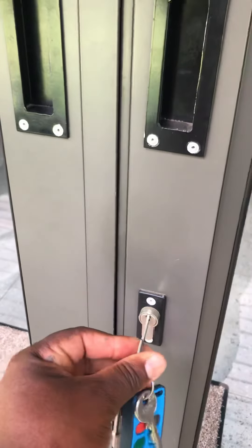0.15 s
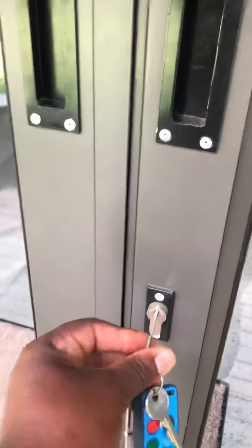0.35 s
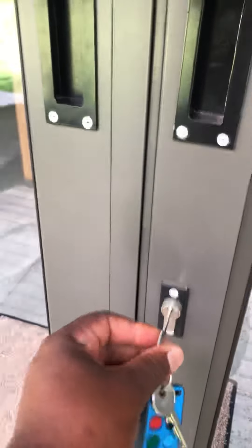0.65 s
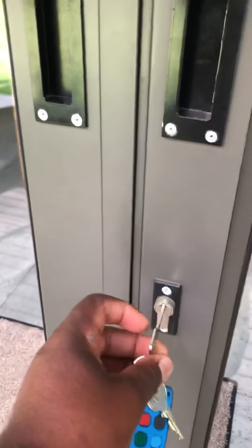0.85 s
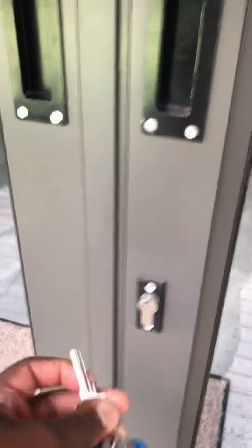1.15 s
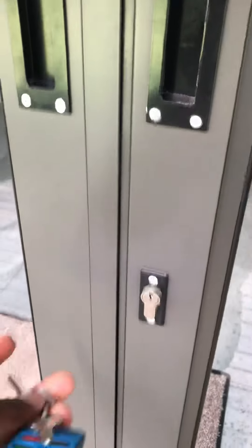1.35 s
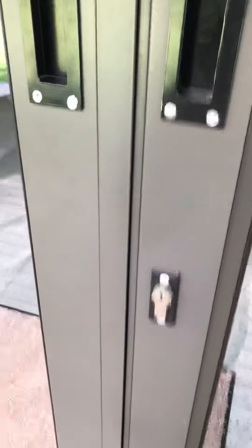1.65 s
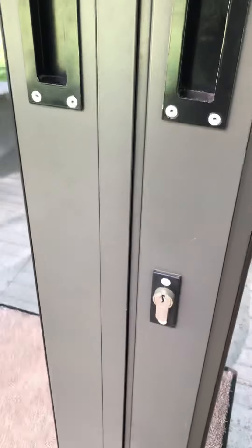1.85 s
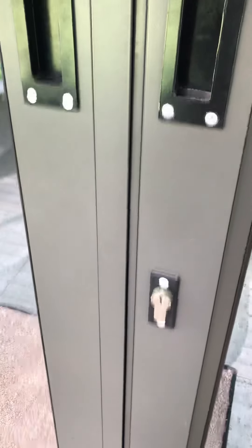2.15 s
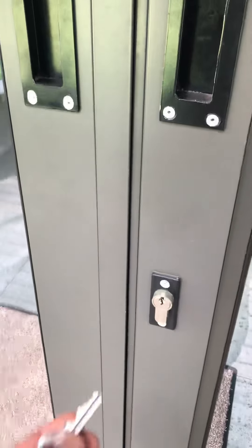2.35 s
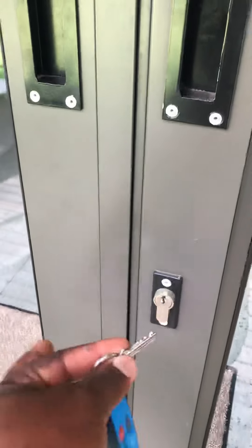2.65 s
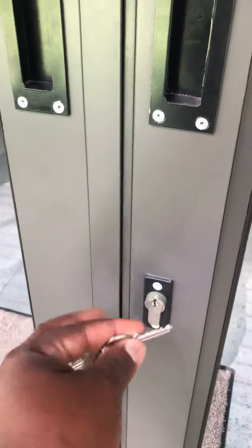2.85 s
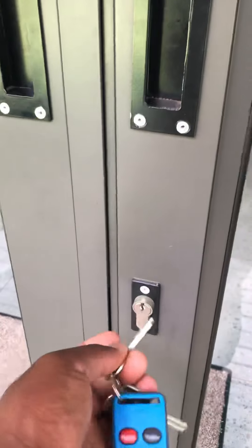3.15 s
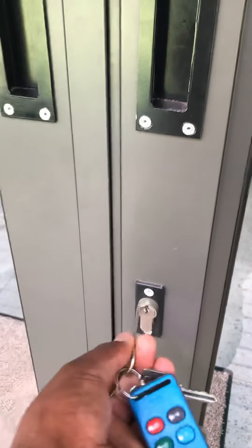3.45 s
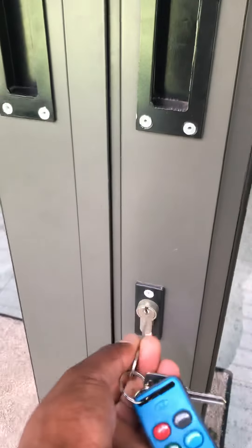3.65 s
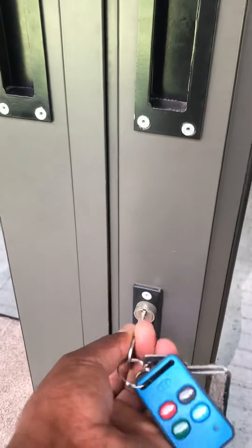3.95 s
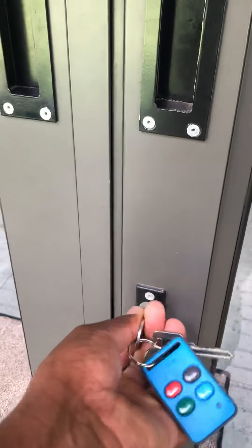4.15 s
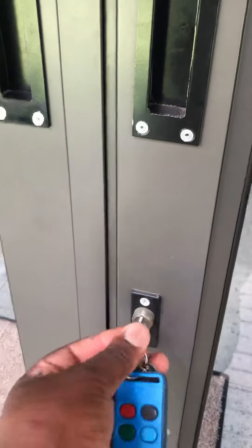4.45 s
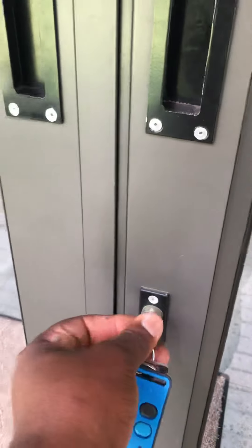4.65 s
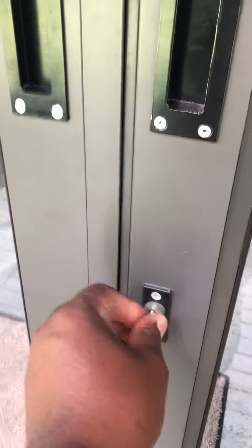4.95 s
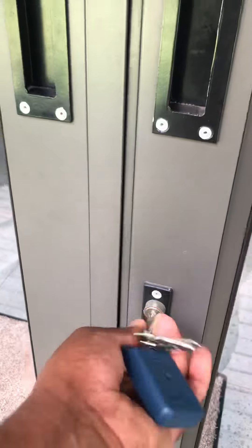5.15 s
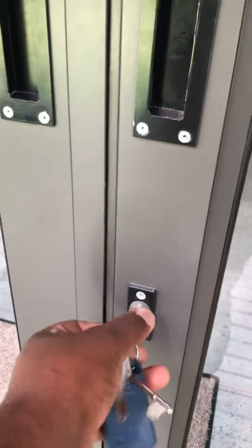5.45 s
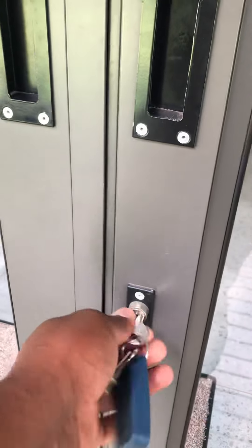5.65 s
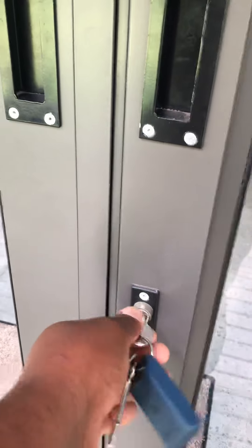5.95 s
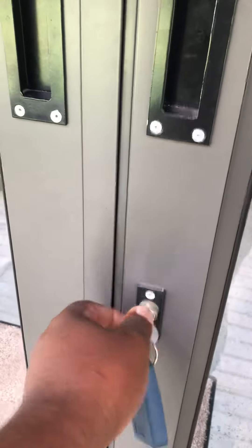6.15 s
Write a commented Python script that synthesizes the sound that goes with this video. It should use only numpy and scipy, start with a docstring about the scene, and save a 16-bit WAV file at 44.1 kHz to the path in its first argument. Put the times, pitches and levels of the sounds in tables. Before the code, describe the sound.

Small dry lock clicks come first, with a sharp snap at about one second, then thin high key tinkles growing busy. A quick ratchet of pins and scrape follows, then firm double clacks and a loud hollow bolt strike with chatter. The microphone is close, with a short porch echo; outdoors, road roar and a low sinking engine hum rise behind distant falling bird whistles.

```python
"""A key is drawn out of a metal-framed door on a porch; the bunch jangles while another key is picked. That one
is pushed in over the pins and turned until the bolt shoots and the frame rings: contacts are short noise bursts
plus decaying modes, and the key and the sliding bolt scrape in tiny slips through resonators. Behind it a
vehicle passes with swelling road noise and a slowly sinking hum, and a far bird whistles in falling glides."""
import sys
import numpy as np
from scipy import signal
from scipy.fft import rfft, irfft
from scipy.io import wavfile

SR = 44100
rng = np.random.default_rng(int(sys.argv[2]) if len(sys.argv) > 2 else 0)


def put_to_file(sound):
    """Save the sound as 16-bit audio at rate SR, in the file named by the first command-line argument."""
    columns = np.atleast_2d(sound).T  # one column per channel
    safe = np.clip(columns, -1, 1)
    whole_steps = np.round(safe * 32767)
    wavfile.write(sys.argv[1], SR, whole_steps.astype(np.int16))


N = 277830
TIME = np.arange(N) / SR
AGE = TIME[:SR // 3]   # seconds since a blow
ATTACK = int(.004 * SR)   # samples that set the level of a blow


def from_db(db):
    """Amplitude factor of a level in dB."""
    return 10 ** (np.asarray(db) / 20)


def rms_one(x):
    """Scale a sound to rms 1."""
    return x / np.sqrt(np.mean(x ** 2) + 1e-20)


def attack_one(x):
    """Scale a blow so that its first milliseconds have rms 1."""
    return x / np.sqrt(np.mean(x[:ATTACK] ** 2) + 1e-20)


def add(out, s, sound):
    """Mix a sound in at time s."""
    i = int(np.clip(s * SR, 0, N - 1))
    out[i:i + len(sound)] += sound[:N - i]


def coloured(x, spectrum):
    """Give a noise the stated spectrum; rms 1."""
    hz, db = np.transpose(spectrum)
    bins = np.maximum(np.fft.rfftfreq(len(x), 1 / SR), 1)
    gain = from_db(np.interp(np.log(bins), np.log(hz), db))
    return rms_one(irfft(rfft(x) * gain, len(x)))


def drift(rate):
    """Random wandering of rms 1 that takes a new target rate times a second."""
    return rms_one(np.interp(TIME * rate, np.arange(N), rng.standard_normal(N)))


def dying(t60):
    """Exponential decay by 60 dB in t60 seconds, never quicker than 1 ms."""
    return np.exp(-np.log(1000) * AGE / max(t60, 1e-3))


def damped(after_s, t60=0.027):
    """Gain that holds until something touches the key, then dies away."""
    return np.exp(-np.log(1000) * np.maximum(AGE - after_s, 0) / t60)


def crack(spectrum, t60, snap=0.24):
    """An instant of contact, then many short-lived modes that blur into noise."""
    noise = coloured(rng.standard_normal(len(AGE)), spectrum)
    return attack_one(noise * (dying(t60) + snap * dying(0.0091)))


def ring(modes, spread_db=3):
    """Modes (pitch_hz, level_db, t60_s); each blow lands elsewhere and excites them differently."""
    out = np.zeros(len(AGE))
    for hz, db, t60 in modes:
        strength = from_db(db + spread_db * rng.normal())
        out += strength * dying(t60) * np.sin(2 * np.pi * (hz * AGE + rng.random()))
    return attack_one(out)


def grains(spans, per_s, size_db, t60, count=28):
    """A gain that swells and fades over each span, and tiny random contacts through many resonators."""
    stroke = np.zeros(N)
    for start, end, db in spans:
        arch = np.clip(4 * (TIME - start) * (end - TIME) / (end - start) ** 2, 0, 1)
        stroke += from_db(db) * np.sqrt(arch)
    sizes = from_db(size_db * np.minimum(rng.exponential(1, N), 3))
    touches = (rng.random(N) < per_s / SR) * sizes
    strengths = rng.normal(size=N) ** 2 * rng.choice([-1, 1], N)
    out, radius = np.zeros(N), from_db(-60 / (t60 * SR))
    for k, hz in enumerate(np.linspace(1500, 15300, count) + rng.uniform(-200, 160, count)):
        w = 2 * np.pi * hz / SR
        # rolling the strengths gives each contact its own mix of pitches
        hits = touches * np.roll(strengths, k) + 1e-18
        out += signal.lfilter([0, np.sin(w)], [1, -2 * radius * np.cos(w), radius ** 2], hits)
    return stroke, out


# background noise: pitch_hz, relative_level_db
AIR_COLOUR = [(25, -24), (100, -2), (400, 9.5), (1500, -46), (3000, -23), (6500, -13), (9500, -20),
              (10500, -21), (16000, -25)]


def air():
    """Steady quiet background: shaped noise."""
    return from_db(-59) * coloured(rng.standard_normal(N), AIR_COLOUR)


def passing(nearest_s, db, width_s):
    """Gain of a source on a straight road, falling as one over its distance."""
    return from_db(db) / np.hypot(1, (TIME - nearest_s) / width_s)


# colours of the three road noises: pitch_hz, relative_level_db
TYRE_COLOUR = [(30, -28), (130, -7.5), (200, -7), (320, -7.5), (480, -12), (650, -7.5), (830, 1),
               (970, 0.5), (1250, -7), (1800, -15), (2600, -22.5), (4500, -29.5), (8000, -41.5),
               (11000, -50)]
RUMBLE_COLOUR = [(20, -24), (33, -17), (48, 0), (65, 6), (100, -2), (130, -8), (180, -23.5), (300, -37),
                 (700, -93)]
DRONE_COLOUR = [(30, -51), (118, 6.5), (145, 0.5), (180, 3), (240, -7), (500, -29), (3000, -92)]
# how each road noise swells and fades: nearest_s, level_there_db, time_to_fall_3_db_s
TYRE_PASS = (4.78, -36.5, 1.61)
RUMBLE_SWELL = (3.16, -36, 1.45)
DRONE_SWELL = (5.7, -43.5, 1.44)
# how the exhaust note comes and goes: time_s, level_db (before the engine trim)
EXHAUST_FADER = [(0, -50), (2.5, -49.5), (3.3, -36), (3.54, -38), (3.57, -32), (4.29, -25.5), (4.37, -35.5),
                 (4.43, -29), (5.0, -29), (5.06, -35), (5.4, -39.5), (5.43, -33.5), (6.22, -30), (6.3, -32)]
# the note's middle pitch, its reach to either side, when it is there and how slowly it sinks
EXHAUST_HZ, DOPPLER_HZ, ABREAST_S, GLIDE_S = 89.65, 10.5, 3.8, 2.2


def traffic(engine_db=-1, waver_db=0.5, overtone_db=-24):
    """Rumble, then tyre roar, then drone reach their loudest; the exhaust note sinks as the vehicle goes by."""
    fader_s, fader_db = np.transpose(EXHAUST_FADER)
    level_db = np.interp(TIME, fader_s, fader_db) + engine_db + waver_db * drift(12)
    receding = (TIME - ABREAST_S) / np.hypot(GLIDE_S, TIME - ABREAST_S)   # towards -1 nearing, +1 leaving
    hz = (EXHAUST_HZ - DOPPLER_HZ * receding) * (1 + 0.0074 * drift(12))
    phase = 2 * np.pi * np.cumsum(hz) / SR
    note = np.sin(phase) + from_db(overtone_db) * np.sin(2 * phase)
    out = from_db(level_db) * np.sqrt(2) * note
    layers = ((RUMBLE_SWELL, RUMBLE_COLOUR), (TYRE_PASS, TYRE_COLOUR), (DRONE_SWELL, DRONE_COLOUR))
    for path, colour in layers:
        out += passing(*path) * coloured(rng.standard_normal(N), colour)
    return out


# the bird's falling whistles: start_s, first_pitch_hz, level_db (before the bird trim)
BIRD_WHISTLES = [(.05, 4420, -51), (1.54, 4300, -57), (2.16, 3610, -58), (3.14, 3500, -51),
                 (3.48, 4300, -57), (3.8, 4200, -49)]
WHISTLE_S, WHISTLE_FALL = .21, .2   # length; share of the pitch lost


def bird(level_db=-5, blur_hz=190, flutter_db=3):
    """Far whistles glide down, blurred and broken up by their many paths."""
    out = np.zeros(N)
    blur = blur_hz * drift(600)
    for start, first_hz, db in BIRD_WHISTLES:
        along = np.clip((TIME - start) / WHISTLE_S, 0, 1)
        hz = first_hz * (1 - WHISTLE_FALL * along) + blur
        swell = np.sqrt(np.abs(np.sin(np.pi * along)))
        out += from_db(db + level_db) * swell * np.sin(2 * np.pi * np.cumsum(hz) / SR)
    return out * from_db(flutter_db * drift(66))


# single contacts of the key, its fob and the lock's parts: start_s, contact_name, level_db (before shares)
SINGLE_CLICKS = [(.0947, "tip", -46.5), (.151, "tip", -50.5), (.287, "tip", -48), (.5528, "tip", -45),
                 (.599, "tip", -48), (.6247, "tip", -47), (.99, "pin", -27), (.997, "fob", -41),
                 (1.5848, "fob", -35), (1.6602, "fob", -35.5), (1.733, "tip", -43),
                 (1.7871, "shank", -29.5), (2.8563, "fob", -36.5), (3.422, "plug", -37.5),
                 (4.1121, "blade", -30), (4.4757, "tip", -34), (4.5047, "pin", -25), (4.8955, "pin", -23),
                 (5.2586, "pin", -36), (5.3112, "tip", -36), (5.4316, "tip", -30), (5.5891, "pin", -26),
                 (5.596, "bolt", -24), (5.6628, "bolt", -21.5), (5.6912, "shank", -31),
                 (5.7109, "plug", -27), (5.848, "tip", -34), (5.9012, "pin", -42), (6.259, "plug", -37.5),
                 (6.2924, "blade", -31)]
# a part runs against its stop and strikes again as the play is taken up:
# start_s, contact_name, level_db, gap_s, second_level_db (levels before shares)
DOUBLE_CLACKS = [(0.3993, "shank", -28.5, 0.005, -36), (.964, "blade", -18.5, .0035, -20),
                 (3.6093, "tip", -29, 0.012, -35), (4.137, "plug", -23, 0.0033, -25),
                 (4.5125, "plug", -21, 0.0075, -19), (5.2209, "plug", -23, .0133, -26.5),
                 (5.7146, "bolt", -12.5, 0.0051, -10)]
# the key speeds up as it goes in, so each pin follows sooner than the last
PINS_START_S, FIRST_PIN_GAP_S, PIN_GAP_RATIO = 4.0279, .0227, .85
PIN_DB, PIN_FADE_DB = -28, 1   # first pin; loss per pin
# the thrown bolt chatters in its keep, ever more softly
CHATTER_START_S, CHATTER_GAP_S, CHATTER_DB, CHATTER_FADE_DB = 5.7238, .013, -19.5, 3.5


def contacts():
    """Every blow of key, fob and lock parts: clicks, double clacks, the run over six pins, bolt chatter."""
    blows = list(SINGLE_CLICKS)
    for s, kind, db, gap, second_db in DOUBLE_CLACKS:
        blows += [(s, kind, db), (s + gap, kind, second_db)]
    for k in range(6):
        elapsed = FIRST_PIN_GAP_S * (1 - PIN_GAP_RATIO ** k) / (1 - PIN_GAP_RATIO)
        blows.append((PINS_START_S + elapsed, "pin", PIN_DB - PIN_FADE_DB * k))
    for k in range(6):
        blows.append((CHATTER_START_S + CHATTER_GAP_S * k, "bolt", CHATTER_DB - CHATTER_FADE_DB * k))
    return blows


# how each kind of contact sounds, by name: hollow_knock_db, bright_click_db, sharp_snap_db,
# click_noise_pitch_ratio, click_noise_t60_s (zero or less gives the shortest click)
CONTACT_KINDS = {"tip": (-5, 0, -26, 0.9, 0.0559), "shank": (-5.5, -1, -13, 1, 0),
                 "blade": (-19.5, 0, -7.5, 0.95, 0.01), "pin": (-18, -5.5, 0, 1.14, .014),
                 "plug": (-9, 0, -2.5, 1, -0.01), "bolt": (-5, -1, -5.5, 1.0, 0.0333),
                 "fob": (-2, -5, -3, 1.1, -0.03)}
# the lock cylinder and its case: pitch_hz (before seating), relative_level_db, t60_s
CYLINDER_MODES = [(2300, -19, 0.12), (2870, -30, 0.042), (3160, -3, 0.08), (3860, -27, 0.042),
                  (3800, -5, 0.12), (4360, 5.5, 0.075), (4670, -20, 0.076), (5110, -4, 0.02),
                  (5400, 3, 0.056), (6440, -0.5, 0.045), (6820, -12, 0.082), (6950, 1, 0.026)]
# the hollow door frame: pitch_hz, relative_level_db, t60_s
HOLLOW_FRAME_MODES = [(1447, 2.5, 0.027), (1498, 2.5, 0.058), (1710, 0.5, 0.091), (1920, 1, 0.032),
                      (2130, -10, .22), (2340, -6.5, 0.17)]
# contact noises of frame, cylinder (before its pitch ratio) and metal edge: pitch_hz, relative_level_db
FRAME_COLOUR = [(100, -4.5), (300, -21), (600, -2.5), (1100, -2), (1600, 0), (2400, 0), (3300, -2),
                (6000, -22.5)]
CYLINDER_COLOUR = [(1000, -11.5), (2200, -16.5), (3200, 8.5), (4400, 0.5), (7200, -2), (9000, -35),
                   (13000, -28)]
EDGE_COLOUR = [(4000, -20), (7000, 3.5), (9700, -1), (10800, 2), (12800, 4), (16000, 4.5)]


def key_and_lock(frame_db=-1.0, cylinder_db=-2.0, edge_db=0, frame_ring_db=-7, cylinder_ring_db=-7,
                 heavy_db=-33):
    """Each contact gives a sharp snap, a ring of the cylinder and a knock of the frame."""
    out = np.zeros(N)
    for s, kind, level in contacts():
        *shares_db, pitch, click_t60 = CONTACT_KINDS[kind]
        frame, cylinder, edge = level + np.array(shares_db)

        knock = crack(FRAME_COLOUR, t60=0.068) + from_db(frame_ring_db) * ring(HOLLOW_FRAME_MODES)

        seating = 1 + rng.uniform(-0.048, 0.05)   # the pitch shifts with how key and pins are seated
        seated_modes = [(hz * seating, db, t60) for hz, db, t60 in CYLINDER_MODES]
        click = crack([(hz * pitch, db) for hz, db in CYLINDER_COLOUR], click_t60)
        click = click + from_db(cylinder_ring_db) * ring(seated_modes)

        dulling = max(frame - heavy_db, 0)   # heavy parts stay in contact longer and lose the top
        snap = crack([(hz, db - dulling * (hz > 10200)) for hz, db in EDGE_COLOUR], t60=0.023)

        blow = from_db(frame + frame_db) * attack_one(knock)
        blow += from_db(cylinder + cylinder_db) * attack_one(click)
        blow += from_db(edge + edge_db) * snap
        add(out, s, blow)
    return out


# key scraping, in the keyway or outside it, and at the end the bolt sliding: start_s, end_s, level_db (of the
# dull part)
SCRAPES = [(.99, 1.024, -57), (1.617, 1.762, -57), (3.998, 4.08, -49.5), (4.078, 4.16, -37.5),
           (4.496, 4.568, -57), (5.095, 5.22, -55.5), (5.21, 5.267, -35.5), (5.42, 5.562, -46),
           (5.575, 5.712, -48), (5.74, 5.87, -53)]


def scraping(bright_db=-7):
    """The key scrapes, in the keyway or outside it, and the thrown bolt slides, in many tiny slips."""
    stroke, slips = grains(SCRAPES, per_s=1200, size_db=1.0, t60=0.0078)
    return stroke * (coloured(slips, CYLINDER_COLOUR) + from_db(bright_db) * coloured(slips, EDGE_COLOUR))


# bending modes of three keys and the ring that holds them, by name: pitch_hz, relative_level_db
BENDING_MODES = { "long": [(2820, -26), (5630, -28), (7060, -14.5), (9960, -8.5), (12652, 1), (12715, -13),
                 (13390, -9), (14785, -7.5)], "short": [(5630, -9.5), (6950, -12), (10090, 1.5),
                 (11800, -13), (12780, 5), (13420, -12.5), (14850, 1)], "split ring": [(5630, 3),
                 (7100, -2), (10050, -17), (12700, -5), (14850, -14)], "flat": [(5810, -9.5), (7620, 6),
                 (11400, -1.5), (12400, 3.5), (13450, -20), (14850, -17)]}


def key_ring(key, t60):
    """One key's modes; the fingers hold it differently each time and favour some over others."""
    return ring([(hz, db, t60) for hz, db in BENDING_MODES[key]], spread_db=3.5)


# the clear knocks of key on key: start_s, key_name, ring_level_db, tick_level_db (before the tick trim)
KEY_KNOCKS = [(1.0963, "short", -44, -42.5), (1.866, "split ring", -46, -47),
              (2.053, "split ring", -35, -48.5), (2.176, "short", -50, -46), (2.2027, "short", -41, -40.5),
              (2.3438, "flat", -33.5, -58), (2.5347, "short", -51, -51), (2.5623, "long", -55, -40.5),
              (2.665, "flat", -40.5, -43.5), (2.7083, "flat", -34, -36), (2.7417, "short", -30, -38),
              (2.821, "short", -40, -55), (2.863, "long", -29.5, -44), (2.935, "long", -31.5, -58),
              (2.9477, "short", -29.5, -43), (2.966, "long", -33.5, -47), (3.0654, "short", -40, -47),
              (3.0973, "split ring", -46, -54), (3.112, "short", -42, -48), (3.125, "short", -22.5, -49),
              (3.1464, "short", -25, -50), (4.2443, "short", -52, -45.5), (4.2638, "short", -43.5, -42),
              (4.4291, "short", -35, -24), (4.4446, "short", -42, -31), (4.544, "short", -35, -44),
              (4.5794, "short", -32.5, -51), (4.5992, "short", -37, -39.5), (5.3224, "short", -42, -41),
              (5.338, "short", -43, -45.5), (5.4147, "long", -39, -45), (5.463, "short", -28, -25.5),
              (5.499, "long", -46, -32), (5.513, "short", -42, -38), (5.5322, "short", -46, -31),
              (5.7922, "short", -40, -36), (5.975, "split ring", -44.5, -43), (6.213, "long", -31, -38),
              (6.274, "long", -31, -42)]
# how long each key rings in the hand, by name: t60_s
HELD_KEY_T60 = {"long": 0.13, "short": 0.041, "split ring": 0.038, "flat": 0.077}
# touch of key on key: pitch_hz, relative_level_db
TICK_COLOUR = [(900, -10), (2000, -0.5), (3000, 13), (5000, 6), (8000, 6), (12500, -2.5), (16000, 11)]
# the keys' quickly dying overtones: pitch_hz, relative_level_db
SPLASH_COLOUR = [(5000, -15.5), (8800, -9.5), (10000, -1.5), (10900, -11), (12700, 3), (13500, -8),
                 (14200, -13), (14900, -28), (16000, -11)]


def keys(contact_db=3.0, overtones_db=-7, tick_t60=0.046, overtones_t60=0.046):
    """A struck key rings freely until the next knock damps it."""
    out = np.zeros(N)
    next_knocks = [row[0] for row in KEY_KNOCKS[1:]] + [N / SR]
    for (s, key, level, tick), stop in zip(KEY_KNOCKS, next_knocks):
        chime = from_db(level) * key_ring(key, HELD_KEY_T60[key]) * damped(stop - s)
        touch = from_db(tick + contact_db) * crack(TICK_COLOUR, tick_t60)
        overtones = from_db(level + overtones_db) * crack(SPLASH_COLOUR, overtones_t60)
        add(out, s, chime + touch + overtones)
    return out


# the bunch shifting in the hand: start_s, end_s, level_db (of the rattle; the jingle trims it)
BUNCH_SHIFTS = [(1.55, 1.9, -65), (2.0, 2.49, -63), (2.521, 3.2, -54), (4.42, 4.648, -59),
                (5.282, 5.428, -53), (5.42, 5.56, -42.5), (5.56, 5.92, -55), (6.029, 6.297, -62)]


def rattle():
    """Loose keys and their ring touch lightly between the clear knocks."""
    stroke, touches = grains(BUNCH_SHIFTS, per_s=80, size_db=6.5, t60=0.011)
    return stroke * coloured(touches, SPLASH_COLOUR)


def jingle(level_db=-3, spread_db=3, tick_db=-4, t60=0.11, gap_s=.028):
    """While the bunch shifts, one key after another is brushed; their soft rings overlap in a shimmer."""
    out, names = np.zeros(N), list(BENDING_MODES)
    for start, end, db in BUNCH_SHIFTS:
        for s in np.arange(start, end - gap_s, gap_s):
            brush = key_ring(rng.choice(names), t60) + from_db(tick_db) * crack(SPLASH_COLOUR, t60=0.029)
            strength = from_db(db + level_db + spread_db * rng.normal())
            add(out, s + gap_s * rng.random(), strength * brush)
    return out


# the key's shoulder or the bolt jolts the whole door leaf: start_s, level_db (before the soft onset)
LEAF_THUDS = [(4.139, -46), (4.515, -36.5), (5.221, -44), (5.715, -41)]
# the door leaf: pitch_hz, relative_level_db, t60_s
DOOR_LEAF_MODES = [(128, 0, 0.25), (255, -17, 0.18), (348, -2, 0.19), (436, -1.5, 0.16), (525, -9, 0.21)]


def door_leaf():
    """The jolted leaf answers with low modes that build up softly."""
    out = np.zeros(N)
    for s, db in LEAF_THUDS:
        add(out, s, from_db(db) * ring(DOOR_LEAF_MODES) * (1 - dying(0.014)))
    return out


# the long key drags on its ring and sings for a moment
SQUEAK_S, SQUEAK_HOLD_S, SQUEAK_DB, SQUEAK_TICK_DB = 5.4387, 0.023, -17, -25


def squeak(t60=.9):
    """Friction keeps the long key singing, here as a very slow decay, until it slips free."""
    out = np.zeros(N)
    modes = [(hz, db, t60) for hz, db in BENDING_MODES["long"]]
    song = ring(modes, spread_db=2) * damped(SQUEAK_HOLD_S)
    tick = crack(SPLASH_COLOUR, t60=0.035)
    add(out, SQUEAK_S, from_db(SQUEAK_DB) * song + from_db(SQUEAK_TICK_DB) * tick)
    return out


# colour of the porch's echo: pitch_hz, relative_level_db
PORCH_COLOUR = [(200, 6), (1000, 6), (2300, 8.5), (4000, -0.5), (8000, -5.5), (15000, -7.0)]
PORCH_T60_S, PORCH_DB = 0.24, -14.5


def porch(x):
    """Walls and roof send back a short diffuse tail that has lost its treble."""
    tail = coloured(rng.standard_normal(len(AGE)), PORCH_COLOUR)
    tail *= dying(PORCH_T60_S) * (1 - np.exp(-AGE / 0.00072))
    return x + from_db(PORCH_DB) * signal.fftconvolve(x, tail / np.linalg.norm(tail))[:N]


def scene():
    """The door close by and the bird, both with the porch's echo; the street behind."""
    door = key_and_lock() + scraping() + door_leaf()
    bunch = keys() + rattle() + jingle() + squeak()
    return (air() + traffic() + porch(bird() + door + bunch))[None]


def record(dry):
    """Peaks beyond full scale clip and the top is cut above 15.9 kHz."""
    top_cut = signal.ellip(10, .2, 80, 15900, fs=SR, output="sos")
    return signal.sosfilt(top_cut, np.clip(dry, -1, 1))


dry = scene()
out = record(dry)
put_to_file(out)
```